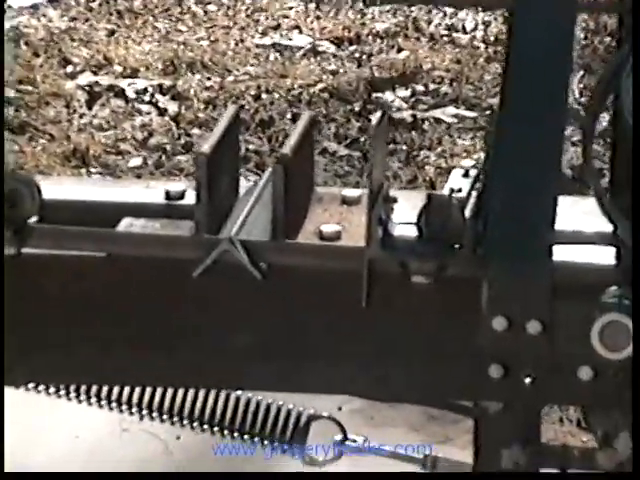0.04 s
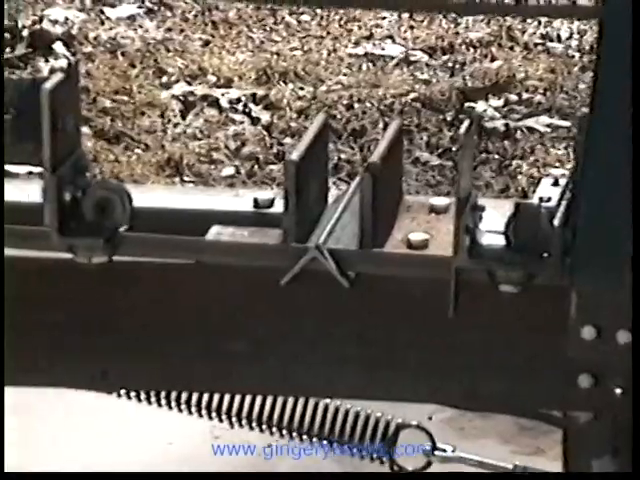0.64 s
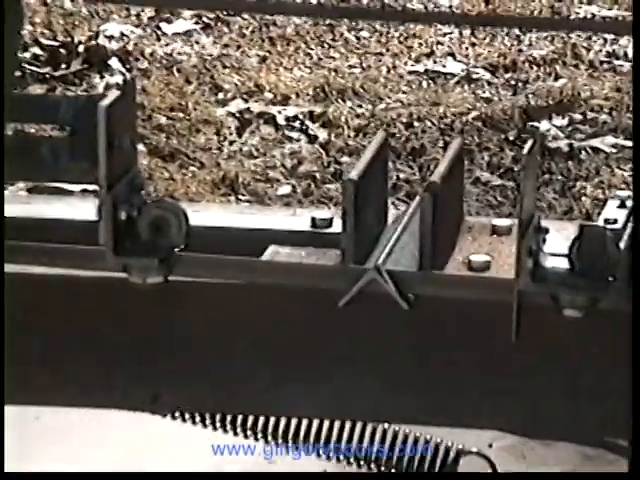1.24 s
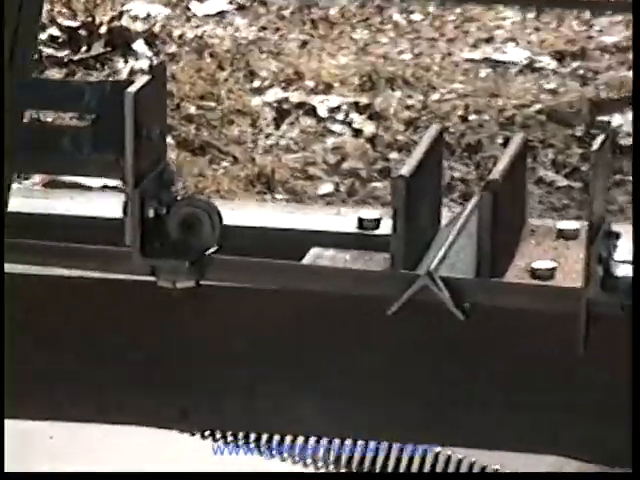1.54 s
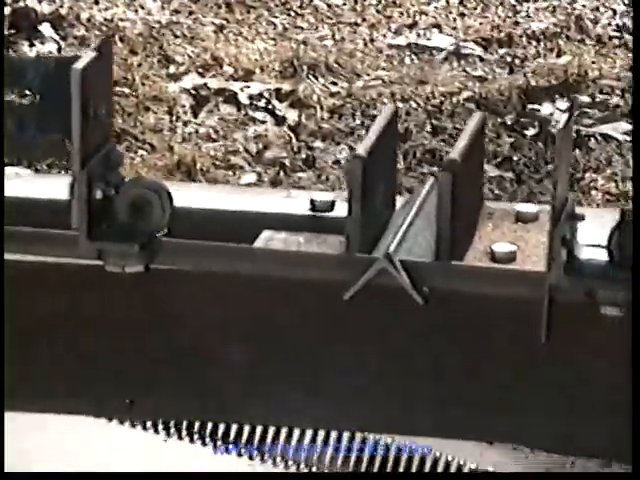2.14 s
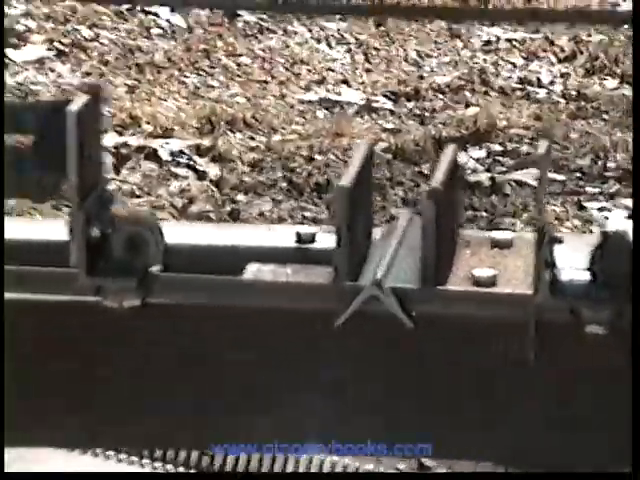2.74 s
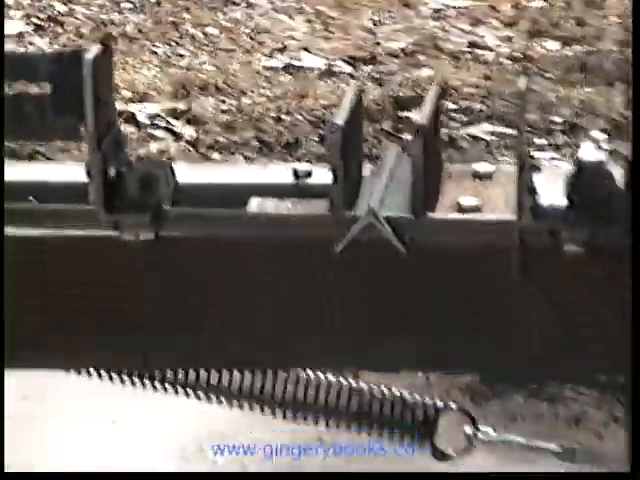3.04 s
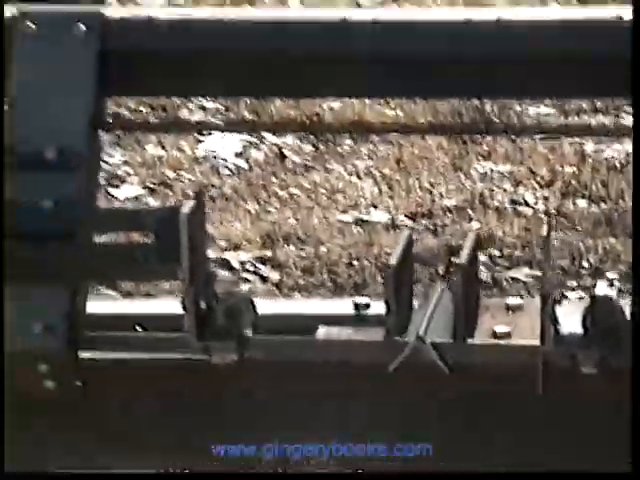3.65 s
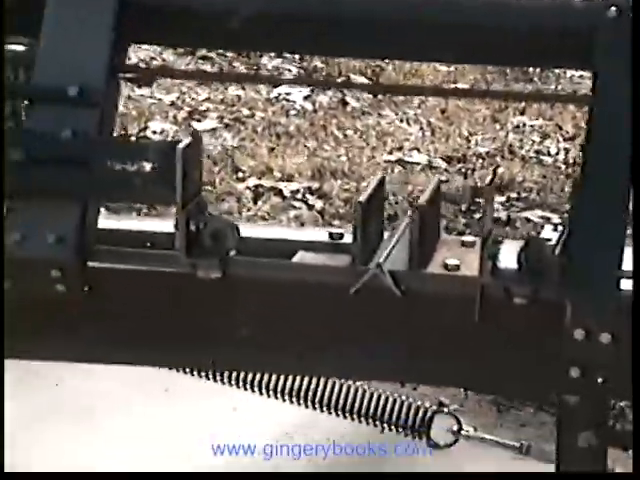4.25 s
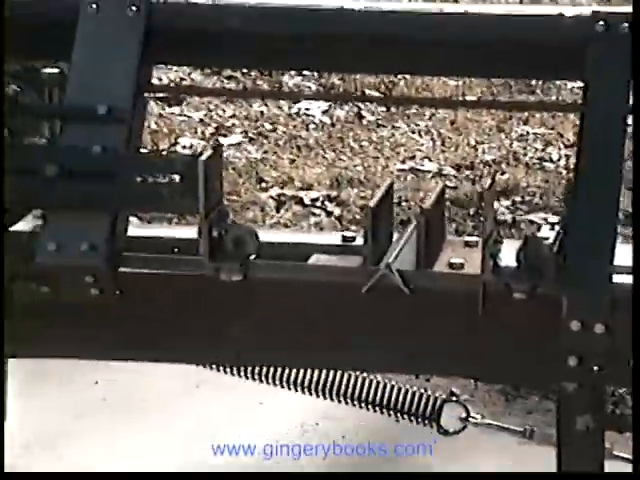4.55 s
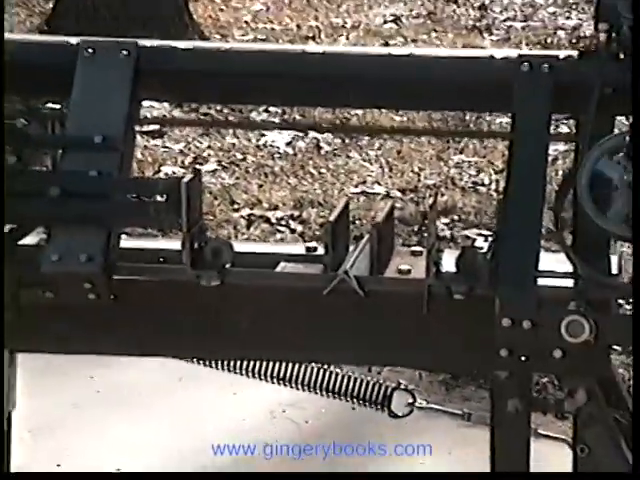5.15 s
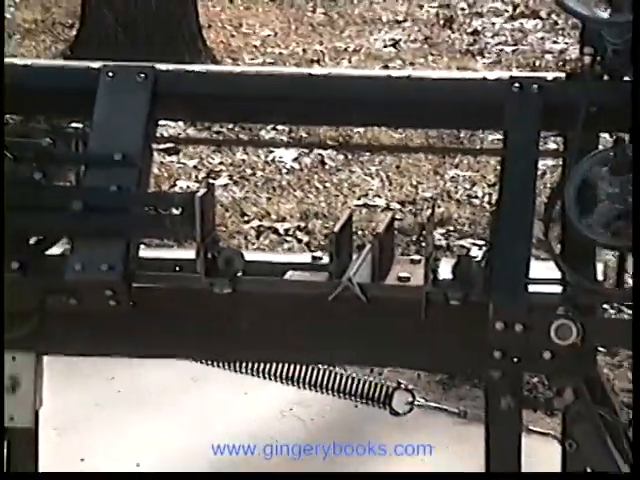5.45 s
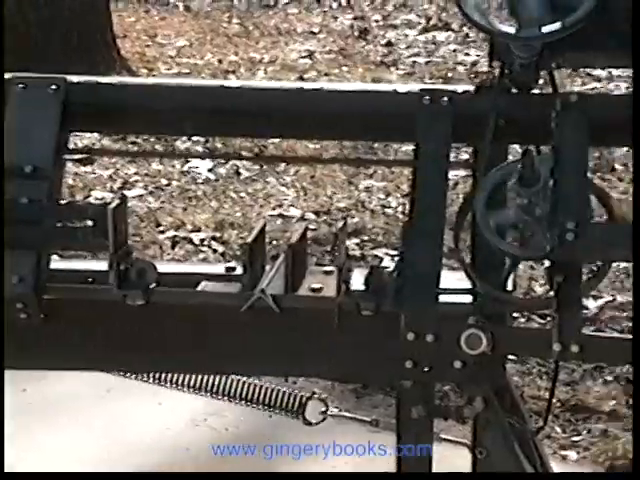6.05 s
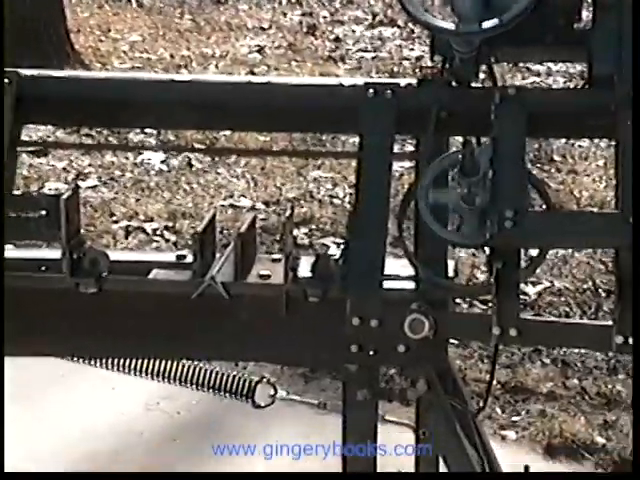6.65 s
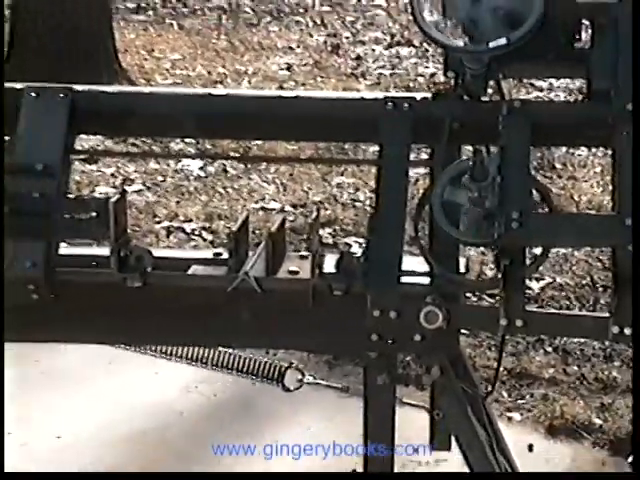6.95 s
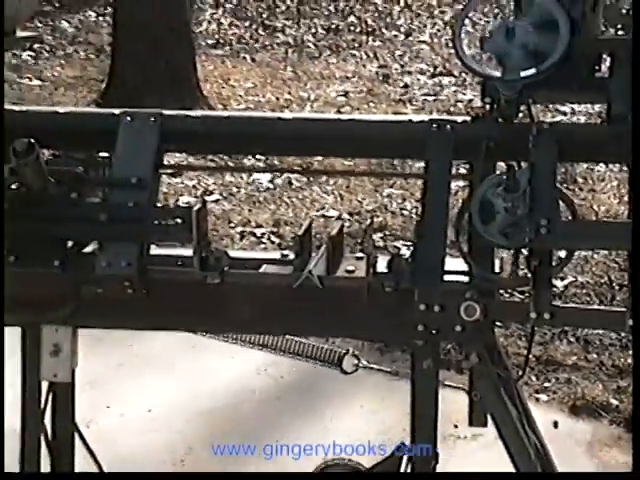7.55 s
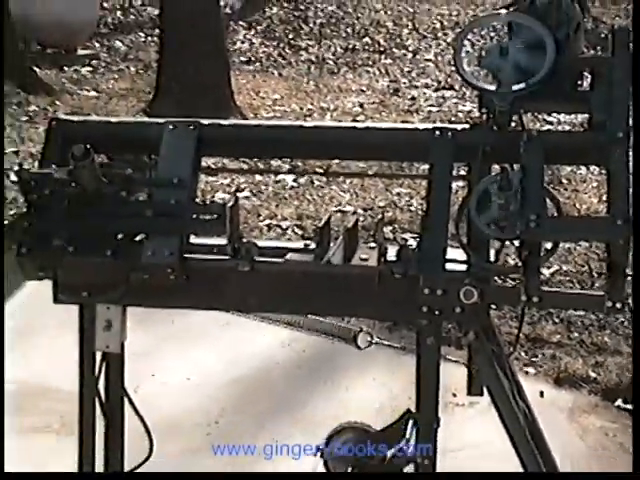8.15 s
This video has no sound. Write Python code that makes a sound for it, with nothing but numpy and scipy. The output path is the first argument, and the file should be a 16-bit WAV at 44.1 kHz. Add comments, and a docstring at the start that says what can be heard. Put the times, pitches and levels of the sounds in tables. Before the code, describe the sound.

A bandsaw rasps and rings through steel over a faint motor hum, then breaks through and the cut piece clatters down.

```python
"""Bandsaw cutting steel

Outdoors, a belt-driven bandsaw cuts a steel angle over a faint motor hum. The teeth rasp in the slot
and make the blade and frame ring. The same spots of the blade catch and judder on every lap.
The cut grows louder near its end, the blade breaks through, and the loose piece drops and clatters."""
import sys
import numpy as np
from scipy import signal
from scipy.fft import rfft, irfft, next_fast_len
from scipy.io import wavfile
from scipy.ndimage import uniform_filter1d, minimum_filter1d

SR = 44100
rng = np.random.default_rng(int(sys.argv[2]) if len(sys.argv) > 2 else 0)


def transcribe(signal):
    """Save signal, clipped to [-1, 1], as a 16-bit WAV file at the path in sys.argv[1]."""
    frames = np.atleast_2d(signal).T
    limited = np.clip(frames, -1, 1)
    pcm = np.round(limited * 32767).astype(np.int16)
    wavfile.write(sys.argv[1], SR, pcm)


N = 366030
TIME = np.arange(N) / SR
LAP_S = 2.281   # one lap of the blade loop
BREAK_S, BREAK_FALL_S = 7.927, .035   # when the blade breaks through, and how long that takes
# How deep the cut is. Each row: time in seconds, share of the way through from 0 to 1.
CUT_DEPTH = [(0, .01), (1.8, 0.16), (2.6, 0.39), (4.0, 0.63), (5.9, .6), (6.4, .86), (7.93, 0.92)]


def rasp():
    """Teeth scrape off chips and ring the steel; the tone shifts as the steel gets thinner."""
    # Overall tone. Each row: frequency in Hz, dB in thick steel, dB when nearly through.
    tone = np.array([(150, -31, -25.5), (570, -18.5, -24.5), (755, -10, -10.5), (943, -16, -12.5),
                     (1300, -4.5, -0.5), (1660, 0.5, 1), (2300, -4.5, -3), (3200, -5, -4), (4750, -1.5, -5),
                     (6660, -4.5, -8.5), (9040, -13, -17), (9940, -18.5, -18), (12300, -41.5, -42),
                     (15500, -45, -47)])
    # Resonances of blade and steel. Each row: pitch in Hz, width in Hz, dB boost when thick, when thin.
    modes = np.array([(1067, 66, 12, 7), (1222, 110, 9.5, -12), (1371, 13, 12, 15), (1507, 20, 5, 4),
                      (1580, 36, -7, -9), (1785, 12, 2, 4), (1895, 29, 9, 0), (1973, 12.7, 10.5, 9.5),
                      (2094, 15, 13, -6), (2254, 27, 7.5, 4.5), (2130, 28, 0, -9), (2501, 72, 3.5, 10.5),
                      (2690, 74, -2, -2.5), (2722, 55, 4, 10.5), (2860, 89, 4.5, 5), (3117, 140, 9.5, -0.5),
                      (3227, 26, 6, 9), (3520, 41, -15, 1), (3540, 79, 13, 6.5), (3779, 16.6, 15.5, 8),
                      (3730, 95, -2, 3.5), (4130, 27, -2, 13.5), (4600, 24, 8, 5), (4880, 37, -4.5, 9.5),
                      (5300, 35, -13, -1), (5810, 360, -8, -4.5), (6060, 170, -4, 6),
                      (7450, 570, -12.5, -6.5), (8340, 165, 2.5, 8.5), (8960, 400, -3.5, 0.5)])
    # The blade rings most when deep in the cut. Each row: time in seconds, dB against the rasp.
    blade_levels = [(0, -32), (1.8, -13), (2.4, -11), (4.0, -15), (5.0, -10.5), (6.2, -9), (7.2, -15),
                    (8.3, -33)]
    # Friction chirps. Each row: pitch in Hz, wander in Hz, dB against the rasp, flicker in dB.
    chirps = [(1982, 38, -19, 11.5), (3654, 110, -17, 3.5)]
    depth = in_time(CUT_DEPTH)
    thick = colour(teeth(per_s=2200, spread_db=.5, friction_db=1), tone[:, :2], modes[:, :3])
    thin = colour(teeth(per_s=2600, spread_db=2, friction_db=1), tone[:, [0, 2]], modes[:, [0, 1, 3]])
    cut = np.sqrt(1 - depth) * thick + np.sqrt(depth) * thin
    cut += from_db(in_time(blade_levels)) * stick_slip(2890, waver_hz=54.9, rough_db=2.5)
    for hz, wander_hz, db, flicker_db in chirps:
        flicker = rms_one(from_db(flicker_db * np.minimum(drift(9.3), 2)))
        cut += from_db(db) * flicker * stick_slip(hz + wander_hz * drift(4), waver_hz=54, rough_db=-2.5)
    flutter_db = 1.17 * drift(33)   # the push on the teeth flutters quickly
    return cut * from_db(cutting_db() + flutter_db)


def light_judder():
    """The blade shudders more with depth and pressure, and stops as it breaks through."""
    level_db = -39.5 + 7 * in_time(CUT_DEPTH) + 4 * pressure_db() + 3.5 * drift(14)
    still_cutting = np.clip((BREAK_S - TIME) / BREAK_FALL_S, 0, 1)
    pitch = 1400 + 50 * drift(4)
    return from_db(level_db) * still_cutting * stick_slip(pitch, waver_hz=60.95, rough_db=4.5)


def snags():
    """A catching tooth strains the blade: it judders and screeches, and the frame thuds."""
    # Chips jam the blade. Each row: peak time and length in seconds, judder pitch in Hz,
    # then judder, screech and thud levels in dB.
    jams = [(0.974, 0.015, 1423, -15.5, -12.5, -37.5), (1.2754, 0.0072, 1463, -9, -3, -27),
            (2.056, .02, 1440, -24, -15, -45), (2.367, 0.017, 1469, -36, -16, -38),
            (2.627, 0.011, 1460, -21, -20, -41), (3.095, 0.024, 1450, -18.5, -18, -47),
            (3.258, 0.011, 1514, -23, -14, -60), (3.571, 0.01, 1452, -29, -21, -36),
            (4.422, 0.018, 1435, -20, -10, -30.5), (5.232, 0.03, 1450, -15, -10, -36.5),
            (5.86, .016, 1407, -35, -11, -39), (6.419, 0.02, 1394, -18, -14, -55),
            (6.7, 0.013, 1383, -31, -24, -36.5), (7.204, .03, 1350, -31, -16, -44)]
    # Tall teeth and the weld catch on every lap. Each row: as above, but timed within the lap.
    catches = [(.093, 0.031, 1430, -20.5, -21.5, -50), (.352, 0.0091, 1403, -30.5, -26.5, -48),
               (.495, 0.054, 1354, -29, -28, -57), (.705, .028, 1432, -24, -24, -54),
               (1.296, 0.019, 1415, -16, -12, -40), (1.535, 0.043, 1450, -27, -22, -47),
               (1.772, 0.02, 1430, -40, -18.5, -47), (2.1, 0.051, 1370, -26, -20.5, -59),
               (2.155, 0.026, 1410, -28.5, -22.5, -52)]
    # Overtones of a hard judder. Each row: multiple of its pitch, level in dB.
    overtones = [(2.06, -4.5), (3.101, 4.5), (4.126, -5)]
    # Blade resonances that screech. Each row: pitch in Hz, width in Hz, level in dB.
    screech_modes = [(1960, 250, -14), (2925, 110, 19), (3380, 120, 16), (3980, 150, 11), (4640, 144, 12),
                     (5060, 120, 13.5), (5980, 68, 11), (6750, 97, 10), (8260, 3200, -2)]
    judder, screech, thud = np.zeros((3, N))
    rows = sorted(every_lap(catches) + [tuple(row) for row in jams])
    for s, length, _, judder_db, screech_db, thud_db in rows:
        judder += from_db(judder_db) * swell(s + .0016, length * .95)   # peaks just after the screech
        screech += from_db(screech_db) * swell(s, length)
        thud += from_db(thud_db) * swell(s, length * .5)
    pitch = in_time([(row[0], row[2]) for row in rows])
    squeal = sum(from_db(db) * stick_slip(multiple * pitch, waver_hz=166.3, rough_db=-10.5)
                 for multiple, db in overtones)
    chips = band(teeth(per_s=3100, spread_db=6, friction_db=-12.5), 730, 8700)
    grind = resonate(chips, screech_modes)
    return (from_db(-2.5) * judder * stick_slip(pitch, waver_hz=55.9, rough_db=2)
            + screech * (from_db(-10) * rms_one(squeal) + from_db(-6.5) * grind)
            + from_db(5.5) * thud * band(rng.standard_normal(N), 16, 580, order=1))


def offcut():
    """The loose piece scrapes free, then lands and bounces: each touch is a clash, a dull thud and a clear
    ring."""
    # Each row is a touch, the first a scrape as the piece comes free: start in seconds, clash in dB, its
    # seconds to fade 60 dB, ring dB, thud dB.
    touches = [(8.026, -36, 0.12, -55, -26.5), (8.1732, -16, 0.29, -14.5, -23.5),
               (8.211, -26, 0.06, -29, -65), (8.282, -26.5, 0.046, -45, -39), (8.292, -26, .1, -24, -27.5)]
    # The notes of the piece. Each row: pitch in Hz, level in dB, seconds to fade 60 dB.
    modes = [(2100, -5, .16), (2482, -9, .3), (2815, -5, .16), (3117, -9, .3), (3885, -15, .15),
             (4780, -8, .2), (5315, 4, .085), (6340, -8, .12), (6635, -14, .2), (7550, -19, .35),
             (8980, -20, .25)]
    # Tone of the clash. Each row: frequency in Hz, level in dB.
    clash_tone = [(180, -55), (300, -42), (892, -25), (1090, -14.5), (1180, -14), (1810, -17), (2070, -7.5),
                  (3510, -10), (5480, -10.5), (15500, -43)]
    clash, thud, rings = np.zeros((3, N))
    for s, clash_db, fade_s, _, thud_db in touches:
        age = np.maximum(TIME - s, 0)
        clash += (TIME >= s) * from_db(clash_db - 60 * age / fade_s)
        thud += (TIME >= s) * from_db(thud_db - 60 * age / .13)
    starts = [min(round(row[0] * SR), N - 1) for row in touches]
    ring_db = np.array(touches)[:, 3]
    for hz, db, fade_s in modes:
        clicks = np.zeros(N)
        clicks[starts] = from_db(ring_db + db) * rng.choice([-1, 1], len(starts))
        rings += ring(clicks, hz, fade_s)
    soften = signal.butter(4, 9500, fs=SR, output="sos")   # the contact is not perfectly hard
    return (signal.sosfilt(soften, rings)
            + clash * colour(rng.standard_normal(N), clash_tone)
            + thud * band(rng.standard_normal(N), 18, 680, order=1))


def singing():
    """The side of the blade rubs thin notes out of the slot, then hisses along the cut face."""
    # Each row: peak time and length in seconds, pitch in Hz, glide in Hz a second, waver in Hz, dB.
    rubs = [(3.6, 0.29, 2510, 0, 26, -37), (5.198, 0.86, 8290, -1, 62, -42),
            (5.72, 0.3, 765, -150, 40, -44), (7.7, 0.21, 3570, -150, 35, -26),
            (7.928, 0.009, 2490, -2.5, 20.7, -18), (7.97, .05, 9300, 3, 50, -44),
            (8.02, 0.023, 2980, -1, 12, -31.5), (8.097, .03, 2970, 0, 12, -41.5),
            (8.247, 0.022, 2960, 2, 14, -26.5), (8.25, .03, 9300, -3, 50, -39),
            (8.3, 0.013, 9250, -1, 80, -16.5)]
    notes = np.zeros(N)
    for s, length, hz, glide, waver_hz, db in rubs:
        pitch = hz + glide * (TIME - s)
        notes += from_db(db) * swell(s, length) * stick_slip(pitch, waver_hz, rough_db=4)
    hiss = band(rng.standard_normal(N), 4200, 8600, order=4)
    return notes + from_db(-31) * swell(8.015, length=.031) * hiss


def blade_guides():
    """The blade runs through its guides with a steady rushing sound."""
    # Each row: frequency in Hz, level in dB.
    tone = [(120, -22), (200, -10), (358, -25.5), (742, -18), (890, -1.5), (1010, -5.5), (2650, -10.5),
            (3010, -9), (3550, -26), (9140, -36), (15500, -70)]
    return from_db(-42.5) * colour(rng.standard_normal(N), tone)


def drive():
    """The motor hums, the belt rumbles, and the frame whines on two notes late in the cut."""
    # Motor tones. Each row: pitch in Hz, level in dB before the depth of the cut changes it.
    motor_tones = [(60, -84), (120, -60.5), (180, -65), (240, -74)]
    # Tone of the belt and wheels. Each row: frequency in Hz, level in dB.
    belt_tone = [(12, -23), (20, 8.5), (81, -4.5), (114, 1), (147, -4), (485, 0), (551, -23), (600, -7.5),
                 (780, -6), (1320, -120)]
    depth = in_time(CUT_DEPTH)
    hum = sum(from_db(db) * np.sqrt(2) * np.sin(2 * np.pi * hz * TIME + .19 * drift(2.4))
              for hz, db in motor_tones)
    rumble = from_db(-51 + 1.3 * drift(15)) * colour(rng.standard_normal(N), belt_tone)
    low_note = stick_slip(505, waver_hz=16.3, rough_db=6)
    high_note = from_db(12) * stick_slip(1024, waver_hz=49.87, rough_db=4.5)
    whine = from_db(cutting_db() - 23.5) * depth ** 4 * (low_note + high_note)
    return hum * from_db(7.5 * depth - 3) + rumble + whine


def cutting_db(drop_db=11, fade_db_per_s=54):
    """The cut is as loud as the push on the teeth, and dies away once the blade is through."""
    # How hard the saw bears down. Each row: time in seconds, level in dB.
    feed = [(0.0, -24.5), (1.86, -24), (1.99, -24), (2.1, -24), (4.94, -23), (5.16, -22.5), (5.55, -24),
            (6.32, -22.5), (6.63, -20.5), (7.22, -21), (7.45, -18), (7.65, -18), (7.78, -18), (7.85, -19)]
    after = np.maximum(TIME - BREAK_S, 0)
    release_db = drop_db * np.minimum(after / BREAK_FALL_S, 1) + fade_db_per_s * after
    return in_time(feed) + 1 + pressure_db() - release_db


def pressure_db(turns_per_lap=8, swing_db=.5, peak_s=.17):
    """The push on the teeth swells with each wheel turn and eases where the blade is dull."""
    # Dull stretches. Each row: seconds into the lap, length in seconds, pressure change in dB.
    dull_spots = [(.025, 0.016, -1.7), (.295, .038, -2), (.615, .018, -0.8), (1.06, 0.062, -1),
                  (1.39, 0.026, -1.5), (1.71, 0.027, -2.5), (1.97, .035, -1)]
    wheel = swing_db * np.cos(2 * np.pi * (TIME - peak_s) * turns_per_lap / LAP_S)
    return wheel + sum(db * swell(s, length) for s, length, db in every_lap(dull_spots))


def teeth(per_s, spread_db, friction_db):
    """Chips break off at random with uneven force, over the hiss of smooth sliding."""
    force = from_db(spread_db * np.minimum(rng.exponential(1, N), 4)) * rng.choice([-1, 1], N)
    chips = rms_one(force * (rng.random(N) < per_s / SR))
    return rms_one(chips + from_db(friction_db) * rng.standard_normal(N))


def stick_slip(hz, waver_hz, rough_db):
    """Rubbing steel grips and slips, making a tone of unsteady pitch and strength."""
    phase = 2 * np.pi * np.cumsum(hz + waver_hz * drift(147.7)) / SR
    return rms_one(np.sin(phase) * from_db(rough_db * drift(164)))


def swell(s, length):
    """A rise and fall around time s, each about `length` seconds: friction grips faster than it lets go."""
    out = np.zeros(N)
    near = slice(max(0, int((s - 4 * length) * SR)), max(0, int((s + 4 * length) * SR)))
    age = (TIME[near] - s) / length
    out[near] = np.exp(-np.where(age < 0, 1.7, 1.2) * age ** 2)
    return out


def every_lap(rows):
    """Repeat events on each lap of the blade until it breaks through."""
    return [(start + s, *rest) for start in np.arange(0, BREAK_S, LAP_S)
            for s, *rest in rows if start + s < BREAK_S]


def colour(x, spectrum, modes=()):
    """Give a sound a broad tone, with narrow peaks and dips on top."""
    hz = np.geomspace(10, SR / 2, 4000)
    points_hz, points_db = np.transpose(spectrum)
    db = np.interp(np.log(hz), np.log(points_hz), points_db)
    for centre, width, boost in modes:
        db += boost / (1 + (2 * (hz - centre) / width) ** 2)
    size = next_fast_len(N)
    gain = np.interp(np.arange(size // 2 + 1) * SR / size, hz, from_db(db))
    return rms_one(irfft(rfft(x, size) * gain, size)[:N])


def resonate(x, modes):
    """Let a sound ring several resonances side by side."""
    out = 0
    for k, (hz, width, db) in enumerate(modes):
        r = np.exp(-np.pi * width / SR)
        poles = [1, -2 * r * np.cos(2 * np.pi * hz / SR), r * r]
        out += (-1) ** k * from_db(db) * (1 - r * r) / 2 * signal.lfilter([1, 0, -1], poles, x)
    return rms_one(out)


def ring(clicks, hz, fade_s):
    """Each click starts a pure tone that fades 60 dB in fade_s seconds."""
    r, w = from_db(-60 / (fade_s * SR)), 2 * np.pi * hz / SR
    return signal.lfilter([0, np.sin(w)], [1, -2 * r * np.cos(w), r * r], clicks + 1e-18)


def band(x, low_hz, high_hz, order=2):
    """Keep the sound between two frequencies."""
    return rms_one(signal.sosfilt(signal.butter(order, [low_hz, high_hz], "band", fs=SR, output="sos"), x))


def drift(rate_hz):
    """A smooth random wander of typical size 1; a higher rate wanders faster."""
    r = np.exp(-40 * np.pi * rate_hz / SR)
    noise = rng.standard_normal(N // 20 + 2002)   # one value every 20 samples
    slow = signal.lfilter([1], [1, -2 * r, r * r], noise)[2000:]
    return np.interp(np.arange(N) / 20, np.arange(len(slow)), rms_one(slow))


def in_time(rows):
    """Join (seconds, value) rows with straight lines."""
    return np.interp(TIME, *np.transpose(rows))


def rms_one(x):
    """Scale to an average strength (rms) of 1."""
    return x / np.sqrt(np.mean(x ** 2) + 1e-20)


def from_db(db):
    """Turn decibels into a multiplier."""
    return 10 ** (np.asarray(db) / 20)


def scene():
    """The saw in open air, close by."""
    return (blade_guides() + rasp() + light_judder() + snags() + drive() + singing() + offcut())[None]


def record(dry):
    """A fast limiter holds the peaks down, and the highest treble is cut."""
    ceiling, reaction_s, cutoff_hz = .55, .002, 15800
    size = int(reaction_s * SR)
    gain = (1 + (dry / ceiling) ** 4) ** -.25
    smooth_gain = uniform_filter1d(minimum_filter1d(gain, size), size)
    return signal.sosfilt(signal.ellip(10, .1, 80, cutoff_hz, fs=SR, output="sos"), dry * smooth_gain)


dry = scene()
out = record(dry)
transcribe(out)
```